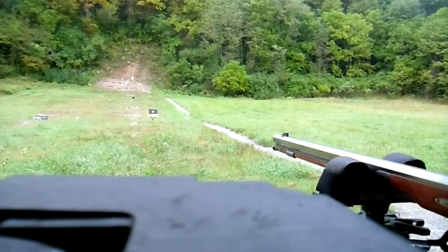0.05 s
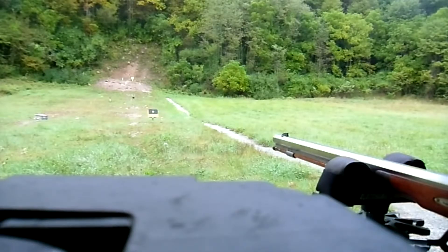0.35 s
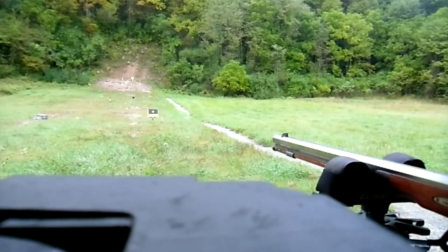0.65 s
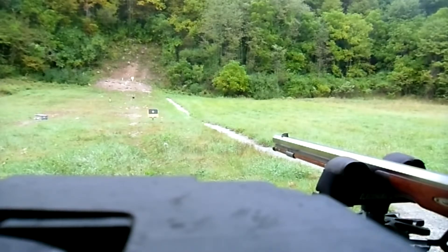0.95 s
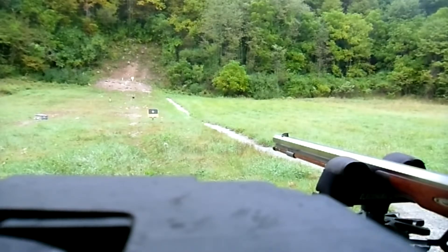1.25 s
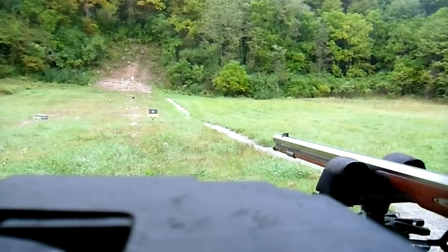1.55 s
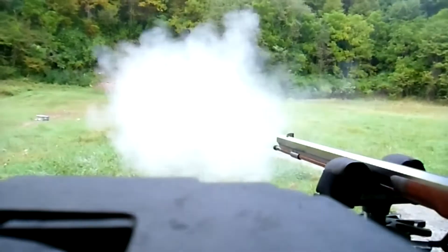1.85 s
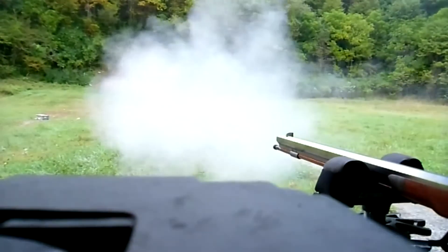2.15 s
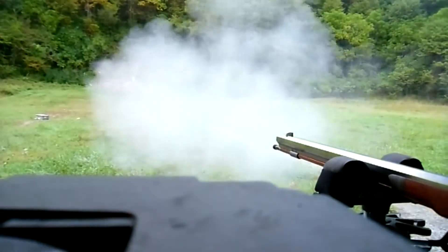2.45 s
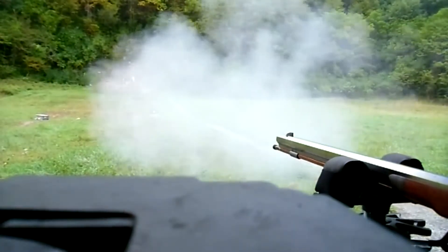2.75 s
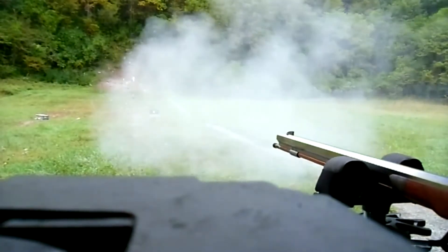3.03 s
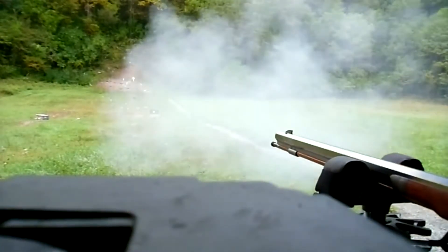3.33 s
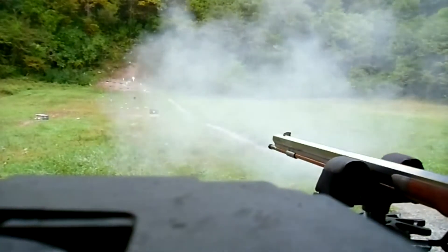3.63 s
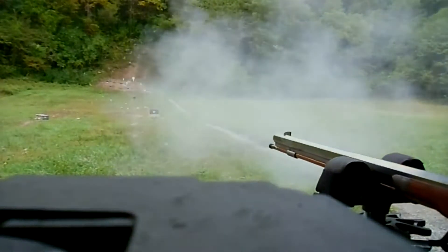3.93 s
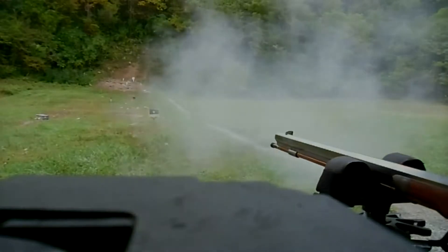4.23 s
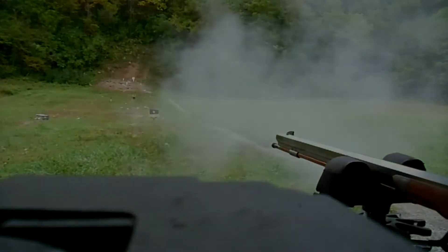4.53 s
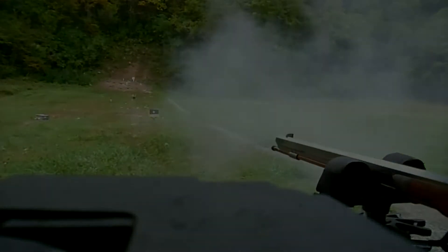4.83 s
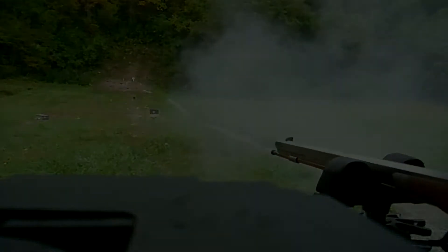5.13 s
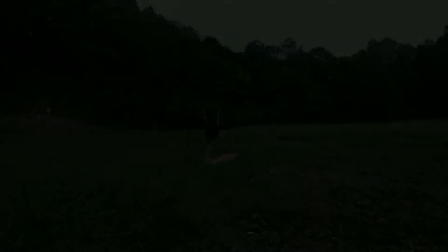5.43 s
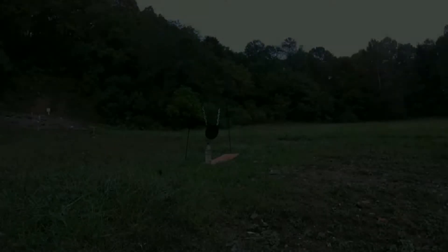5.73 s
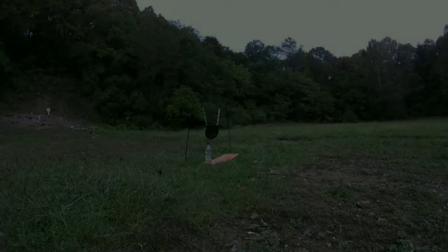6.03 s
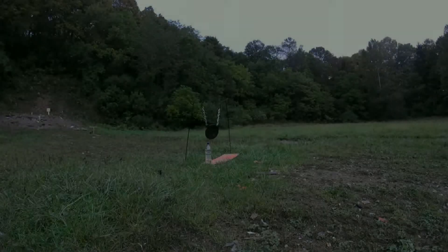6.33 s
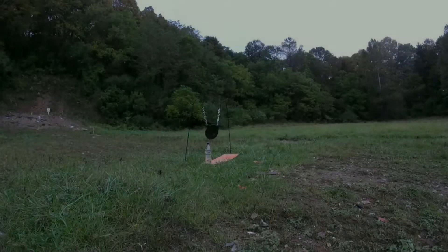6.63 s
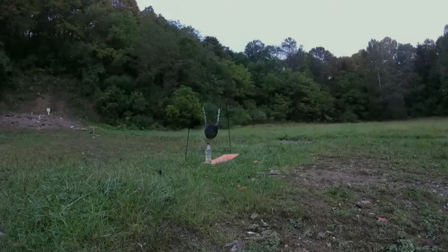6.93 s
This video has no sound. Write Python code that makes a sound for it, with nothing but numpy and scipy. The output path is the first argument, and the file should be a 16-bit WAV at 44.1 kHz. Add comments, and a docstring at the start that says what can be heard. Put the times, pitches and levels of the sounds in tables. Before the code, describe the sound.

The setting is a still meadow below a wooded hillside, with the microphone close to a muzzleloading rifle. At about 0.3 seconds the set trigger gives a sharp metallic click, followed by a few faint ticks. At 1.8 seconds the lock snaps and the priming hisses for an instant, then the shot goes off: a very loud crack and deep boom that overload the microphone, leaving a brief low drumming. At 2.1 seconds the ball smacks a steel plate with a short, high ring. From 2.3 seconds the hillside returns a rolling echo that grows duller as it dies away. Two dull thuds come at about 3.9 and 4.2 seconds. A small bird chips very faintly now and then throughout. The sound fades out by 5.3 seconds, and quiet air with softly trilling insects fades in until the end, near 7 seconds.

```python
"""A meadow below a wooded hillside, the microphone near a muzzleloader. The set trigger clicks, the lock
snaps, the priming flashes and the blast overloads the microphone. The ball rings a steel plate, trees
and slopes roll the shot back, and two dull thuds follow; a small bird chips now and then.
The scene fades out, and a second view of the meadow fades in with trilling insects."""
import sys
import numpy as np
from scipy import signal
from scipy.fft import rfft, irfft, next_fast_len
from scipy.io import wavfile
from scipy.ndimage import uniform_filter1d, map_coordinates

SR = 44100
rng = np.random.default_rng(int(sys.argv[2]) if len(sys.argv) > 2 else 0)


def generate_wav(sig):
    """Save sig (samples, or channels by samples) to the path in sys.argv[1] as 16-bit PCM at SR."""
    pcm = np.round(np.clip(np.atleast_2d(sig).T, -1, 1) * 32767).astype(np.int16)
    wavfile.write(sys.argv[1], SR, pcm)


N = 307818
T = np.arange(N) / SR
SHOT_S, SHOCK_ATTACK_S = 1.8605, .005  # the report: its moment, and the time in which it rises 60 dB
# Spectrum of the report's crack. Each row: frequency in Hz, density in dB.
CRACK_SPECTRUM = [(100, -19), (500, -4.5), (1200, 0.5), (2800, -4.5), (5000, -9), (8000, -12),
                  (12000, -22.5), (16000, -35.5)]


def amp(db):
    """Decibels to gain."""
    return 10 ** (np.asarray(db) / 20)


def unit(x):
    """Scaled to rms 1."""
    return x / np.sqrt(np.mean(x ** 2) + 1e-20)


def along(points, hz):
    """(Hz, value) points joined on a log axis."""
    freqs, values = np.transpose(points)
    return np.interp(np.log(hz + 1e-6), np.log(freqs), values)


def filtered(x, response):
    """x through a filter whose gain is a function of frequency."""
    size = next_fast_len(len(x) + 8192)
    return irfft(rfft(x, size) * response(np.fft.rfftfreq(size, 1 / SR)), size)[:len(x)]


def noise(colour_db, size=N):
    """Noise of rms 1 whose spectrum in dB is a function of frequency."""
    return unit(filtered(rng.standard_normal(size), lambda hz: amp(colour_db(hz))))


def wander(t, per_s, points):
    """A smooth curve through random points, per_s of them each second."""
    return map_coordinates(rng.standard_normal(points), [t * per_s])


def decay(t, t60):
    """Falls 60 dB in t60 seconds."""
    return np.exp(-np.log(1000) * t / t60)


def envelope(s, attack, hold, t60):
    """Rises 60 dB in the attack time up to time s, holds, then falls 60 dB in t60."""
    return decay(np.maximum(s - T, 0), attack) * decay(np.maximum(T - s - hold, 0), t60)


def add(track, s, sound):
    """Mixes a sound into the track at time s."""
    part = track[round(s * SR):][:len(sound)]
    part += sound[:len(part)]


def trees(x, t60, wet_db):
    """x with its scatter from the forest edge."""
    tail = rng.standard_normal(SR) * decay(T[:SR], t60)
    return x + amp(wet_db) * signal.fftconvolve(x, tail / np.linalg.norm(tail))[:len(x)]


def insect(rate, pitch_hz, db, fall=0.14, uneven_db=4.5, overtone_db=-23, wet_db=-3):
    """A trill: every wing stroke slides down in pitch, each at its own strength."""
    pace, drift, effort = [wander(T, per_s=20, points=200) for _ in range(3)]
    cycle = (rng.random() + np.cumsum(rate * (1 + .1 * pace)) / SR) % 1
    stroke = np.minimum(2 * cycle, 1)  # the wing sounds for half of each cycle
    phase = 2 * np.pi * np.cumsum(pitch_hz * (1 + fall * (.5 - stroke) + 0.02 * drift)) / SR
    tone = np.sin(phase) + amp(overtone_db) * np.sin(2 * phase)
    song = amp(uneven_db * effort) * np.sin(np.pi * stroke) * tone
    return amp(db) * unit(trees(song, t60=.3, wet_db=wet_db))


def meadow():
    """Still air, a far insect and the faint whine of the camera's electronics."""
    # Each row: frequency in Hz, density in dB.
    air_spectrum = [(20, 3.5), (66, -5), (130, -14), (220, -18.5), (370, -24.5), (900, -25), (1160, -22.5),
                    (1400, -27), (2300, -28.5), (4700, -31.5), (9000, -32), (15500, -38.5)]
    # Each row: frequency in Hz, rms level in dB.
    whine_tones = [(11972, -78), (12032, -77), (12091, -87)]
    air = amp(-57) * noise(lambda hz: along(air_spectrum, hz))
    whine = sum(np.sqrt(2) * amp(db) * np.sin(2 * np.pi * hz * T) for hz, db in whine_tones)
    return air + whine + insect(rate=17, pitch_hz=5820, db=-79, uneven_db=1, wet_db=12)


def later_meadow():
    """The second view: four insects trill over quiet air."""
    # Each row: frequency in Hz, density in dB.
    air_spectrum = [(20, -2), (90, 1), (250, -7), (630, -12.5), (1160, -16), (2000, -18.5), (4900, -25.5),
                    (6100, -20.5), (7200, -30), (11400, -36), (15500, -48)]
    # Each row: wing strokes per second, pitch in Hz, rms level in dB.
    singers = [(16, 5900, -70), (17, 6280, -70.5), (16, 6100, -73), (16.5, 6000, -75)]
    air = amp(-60) * noise(lambda hz: along(air_spectrum, hz))
    return air + sum(insect(rate, hz, db) for rate, hz, db in singers)


def bird():
    """Each chip shoots up to its top pitch; the microphone gets mostly its scatter from the trees."""
    # Each row: start in seconds, relative level in dB, top pitch in Hz.
    chips = [(1.157, -50, 7140), (2.852, -51, 7700), (3.474, -52, 7600), (4.508, -52, 7730),
             (6.56, -53, 7150)]
    out, t = np.zeros(N), T[:SR // 2]
    progress = np.minimum(t / .016, 1)
    for s, db, top_hz in chips:
        pitch = top_hz * (1 - 0.31 * (1 - progress) ** 3)
        chip = np.sin(np.pi * progress) * np.sin(2 * np.pi * np.cumsum(pitch) / SR)
        add(out, s + .005, amp(db - 10) * trees(chip, t60=.55, wet_db=10))
    return out


def thuds():
    """Low, dull thuds, perhaps far shots or far echoes."""
    # Each row: start in seconds, level in dB, centre in Hz, rise and t60 in seconds.
    events = [(.76, -51, 130, .01, 0.21), (3.869, -34, 240, 0.0013, 0.37), (4.232, -32.5, 228, 0.009, 0.23),
              (4.26, -29.5, 117, 0.0083, 0.32), (4.28, -47.5, 53.5, .04, 2.1)]
    # Each row: multiple of the centre frequency, density in dB.
    spectrum = [(.15, -9.5), (.5, -12.5), (1, -5), (1.6, -17.5), (3, -25.5), (8, -44), (30, -90)]
    out, t = np.zeros(N), T[:SR]
    for s, db, centre_hz, rise, t60 in events:
        body = noise(lambda hz: along(spectrum, hz / centre_hz), size=SR)
        add(out, s, amp(db) * body * (1 - np.exp(-t / rise)) * decay(t, t60))
    return out


def valley():
    """Distant slopes keep a dull roll going after the hillside has died away."""
    # Each row: frequency in Hz, density in dB.
    spectrum = [(30, -5), (120, -13), (230, -11), (340, 3), (550, -1), (900, -3.5), (1500, -13.5),
                (3000, -32)]
    swell = envelope(4.1, attack=4, hold=0, t60=8.1) * (T > SHOT_S)
    return amp(-56) * swell * noise(lambda hz: along(spectrum, hz))


def hillside():
    """Countless trunks across the meadow return the shot; on longer paths the air absorbs more treble."""
    # Each row: frequency in Hz, density in dB.
    spectrum = [(20, -12.5), (35, -11), (80, -10.5), (140, -6), (220, -11.5), (335, 0), (650, 0),
                (1000, 0.5), (1500, -4.5), (2200, -10), (2800, -8), (3600, -13.5), (5000, -13.5),
                (8000, -22), (15000, -44)]
    # Each row: frequency in Hz, t60 in seconds.
    decay_times = [(30, 3.4), (150, 2.16), (400, 2.45), (1000, 2.13), (2000, 1.815), (3000, 1.52),
                   (5000, 1.146), (8000, 0.83), (14000, 0.56)]
    arrival_s, hold_s = 2.255, 0.029
    level_db, patchy_db, crackle_db = -10.5, 1.3, .8
    freqs, times, bands = signal.stft(noise(lambda hz: along(spectrum, hz)), SR, nperseg=1024)
    # clumps of trees answer unevenly, in patches of frequency and time
    clumps = unit(uniform_filter1d(uniform_filter1d(rng.standard_normal(bands.shape), 6, 0), 5, 1))
    dying = decay(np.maximum(times - arrival_s - hold_s, 0), along(decay_times, freqs)[:, None])
    roll = signal.istft(bands * dying * amp(patchy_db * clumps), SR, nperseg=1024)[1][:N]
    trunks = wander(T, per_s=150, points=1200)
    ahead_s = np.maximum(arrival_s - T, 0)
    slope = decay(ahead_s, .14)  # the slope answers all at once
    bushes = amp(-10) * decay(ahead_s, .9)  # bushes at its foot answer earlier
    return amp(level_db + crackle_db * trunks) * np.maximum(slope, bushes) * roll * (T > SHOT_S)


def near_trees():
    """Trees beside the meadow throw back the bright crack, swelling until the sound has crossed it."""
    swell = envelope(2.24, attack=1.0, hold=0, t60=.28) * (T > SHOT_S)
    return amp(-19.5) * swell * noise(lambda hz: along(CRACK_SPECTRUM, hz))


def panel():
    """The blast leaves a panel near the microphone drumming in two low modes."""
    # Each row: frequency in Hz, width of its waver in Hz, level in dB, t60 in seconds.
    modes = [(156, 14, -16.5, 0.47), (214.6, 17, -10.5, 0.9)]
    out, t = np.zeros(N), T[:SR]
    for hz, width, db, t60 in modes:
        waver = wander(t, per_s=30, points=40)
        phase = 2 * np.pi * np.cumsum(hz + width / 2 * waver) / SR
        add(out, 1.93, amp(db) * np.sin(phase) * (1 - np.exp(-t / .02)) * decay(t, t60))
    return out


def plate():
    """Downrange the ball smacks the steel, which rings mostly in its high modes."""
    # Each row: frequency in Hz, relative level in dB, t60 in seconds.
    modes = [(816.7, -14.5, .25), (1090, -16.5, 0.1), (2970, -9, 0.29), (4300, -21, 0.34),
             (4496, -21.5, .3), (4885, -37, 2), (5539, -20, 0.24), (7284, -15, .15), (7824, -12.5, 0.23),
             (8310, 1, 0.14), (9900, -21.5, .25), (11255, 0, .19), (11266, -3.5, 0.24), (11590, -25.5, .2),
             (12760, -20.5, .15), (14380, -25, .2)]
    # Each row: frequency in Hz, density in dB.
    smack_spectrum = [(150, -17.5), (600, -4.5), (1100, 2), (1500, -8.5), (2200, 0.5), (3500, -9.5),
                      (6000, -11.5), (9000, -18.5), (16000, -30)]
    out, t = np.zeros(N), T[:SR]
    ring = sum(amp(db) * decay(t, t60) * np.sin(2 * np.pi * hz * t + rng.uniform(0, 2 * np.pi))
               for hz, db, t60 in modes)
    smack = noise(lambda hz: along(smack_spectrum, hz), size=SR)
    smack *= amp(13) * decay(t, .016) + amp(-6.5) * decay(t, 0.27)
    add(out, 2.097, trees(amp(-0.5) * ring, t60=.6, wet_db=-16.5) + smack)
    return out


def snaps():
    """Snaps and ticks excite the rifle's resonances; the surroundings and the lock spring prolong them."""
    # Each row: start in seconds, level in dB, t60 in seconds, tilt in dB per octave, ring-on in dB.
    events = [(0.341, -25.5, 0.017, -2, -9), (0.3445, -11.5, .016, 0.5, -15.5), (.493, -55, 0.024, 2, -16),
              (.657, -54.5, .025, -7, -20), (.774, -60, .06, -7, -15), (1.7787, -10.5, 0.043, 0.5, -13.5),
              (1.7878, -5.5, .02, 1, -14), (1.7952, -1, .025, -3.5, -17), (3.356, -38, 0.023, -7, -20)]
    # Each row: frequency in Hz, density in dB.
    snap_spectrum = [(100, -33), (330, -28), (480, -12.5), (700, -7), (900, -9.5), (1500, -2), (2700, -3),
                     (4200, -0.5), (5500, -5.5), (7200, -4.5), (8200, -10.5), (13000, -19), (15500, -26)]
    # Lock and barrel. Each row: centre in Hz, width in Hz, relative strength in dB.
    resonances = [(1850, 140, -1.5), (2431, 99, -1), (3030, 63, -1), (4620, 480, 0), (5470, 110, -1.5),
                  (6400, 80, -3.5), (7010, 96, -4.5), (7600, 140, -4.5)]
    # The spring's lingering zing. Each row: frequency in Hz, density in dB.
    spring_spectrum = [(5500, -39), (6600, -9), (7100, -0.5), (7600, -5.5), (8800, -39.5)]
    out, t = np.zeros(N), T[:SR // 2]
    peaks = lambda hz: sum(amp(db + 11) / (1 + (2 * (hz - centre) / width) ** 2)
                           for centre, width, db in resonances)
    metal_db = lambda hz: along(snap_spectrum, hz) + 10 * np.log10(1 + peaks(hz))
    # the finite contact time dulls the first blow
    contact_loss_db = lambda hz: 10 * np.log10(1 + (hz / 10500) ** 4)
    for s, db, t60, tilt_db, ring_db in events:
        colour = lambda hz: metal_db(hz) + tilt_db * np.log2(hz / 3000 + 0.086)
        burst = noise(lambda hz: colour(hz) - contact_loss_db(hz), size=len(t)) * decay(t, t60)
        scatter = noise(colour, size=len(t)) * decay(t, 0.15)
        zing = amp(-9) * noise(lambda hz: along(spring_spectrum, hz), size=len(t)) * decay(t, .17)
        ring_on = amp(ring_db) * (scatter + zing) * (1 - np.exp(-t / .003))
        add(out, s, amp(db) * (burst + ring_on))
    return out


def priming():
    """The priming hisses for an instant before the main charge catches."""
    # Each row: frequency in Hz, density in dB.
    spectrum = [(1000, -25), (5000, -6), (9000, -1), (13000, -2.5), (16000, -12)]
    burn = envelope(1.78, attack=.004, hold=.025, t60=.1)
    return amp(-25.5) * burn * noise(lambda hz: along(spectrum, hz))


def rumble():
    """The sub-bass of the report lingers along the ground and outlasts the boom."""
    # Each row: frequency in Hz, density in dB.
    spectrum = [(20, -2), (45, 0), (80, -7.5), (160, -25), (400, -60)]
    linger = envelope(SHOT_S, SHOCK_ATTACK_S, hold=0, t60=1.0)
    return amp(-16.5) * linger * noise(lambda hz: along(spectrum, hz))


def blast():
    """Puffs of gas, a pressure swell, the shock front, then ground scatter: a crack and a longer boom."""
    # Gas escaping ahead of the report. Each row: peak time in seconds, dB, attack and t60 in seconds.
    gas_puffs = [(1.836, -30.5, 0.069, .12), (1.858, -17, .02, .02)]
    # Each row: frequency in Hz, density in dB.
    boom_spectrum = [(20, -20), (60, -15), (110, -5), (170, -0.5), (280, -4), (450, -3.5), (800, -10),
                     (1600, -25.5), (5000, -51.5)]
    puffs = sum(amp(db) * envelope(s, attack, 0, t60) for s, db, attack, t60 in gas_puffs)
    boom = amp(9.5) * envelope(SHOT_S, SHOCK_ATTACK_S, hold=.072, t60=.34)  # holds as the gas expands
    crack = amp(13) * envelope(SHOT_S, SHOCK_ATTACK_S, hold=.02, t60=.33)
    out = (puffs + boom) * noise(lambda hz: along(boom_spectrum, hz))
    out += (puffs + crack) * noise(lambda hz: along(CRACK_SPECTRUM, hz))
    # a push and a weaker suction run ahead of the report
    swell_age = (T - 1.839) / .0035
    out -= .42 * swell_age * np.exp(-swell_age ** 2 / 2) * np.where(swell_age < 0, 1, .6)
    shock_age = T[:SR // 10] / 0.0019  # the overpressure lasts 1.9 ms
    add(out, 1.8586, 7 * (1 - shock_age) * np.exp(-shock_age))
    return out


def scene():
    """The shot fades out and the later view fades in; both channels are alike."""
    fade_from_s, fade_out_s, cut_s, fade_in_s = 3.83, 1.78, 5.33, 1.46
    fade_out = np.clip(1 - (T - fade_from_s) / fade_out_s, 0, 1) * (T < cut_s)
    fade_in = np.clip((T - cut_s) / fade_in_s, 0, 1)
    echoes = near_trees() + hillside() + valley()
    shot = snaps() + priming() + blast() + rumble() + panel() + plate() + echoes + thuds() + meadow()
    mono = fade_out * shot + fade_in * later_meadow() + (fade_out + fade_in) * bird()
    return np.array([mono, mono])


def record(dry):
    """The microphone's input stage clips hard; nothing is kept above the band limit."""
    ceiling, hardness, top_hz = .87, 5, 15750
    clipped = dry / (1 + np.abs(dry / ceiling) ** hardness) ** (1 / hardness)
    band = lambda hz: 1 / (1 + (hz / top_hz) ** 300)
    return np.array([filtered(channel, band) for channel in clipped])


dry = scene()
out = record(dry)
generate_wav(out)
```